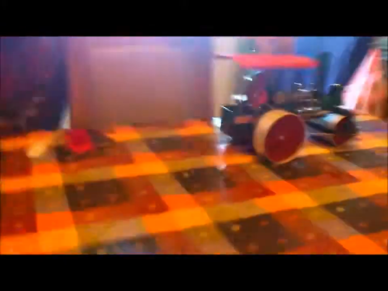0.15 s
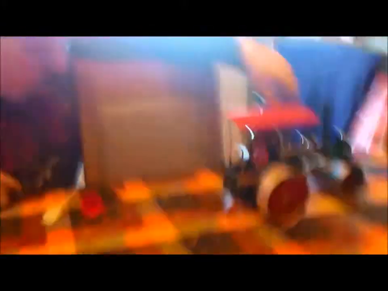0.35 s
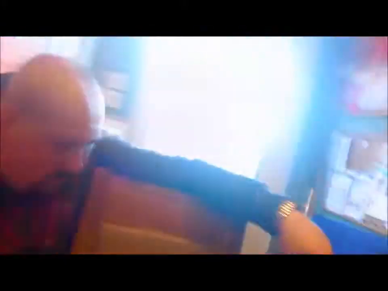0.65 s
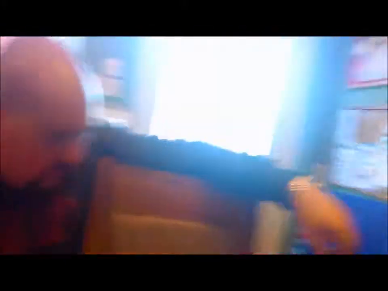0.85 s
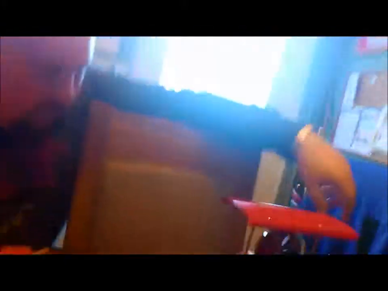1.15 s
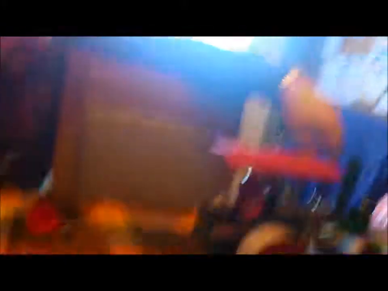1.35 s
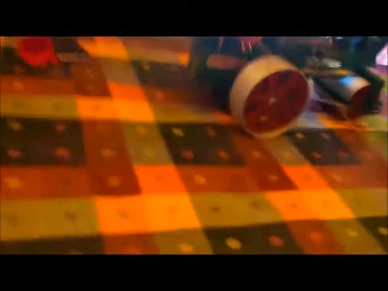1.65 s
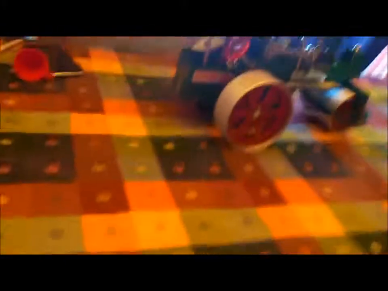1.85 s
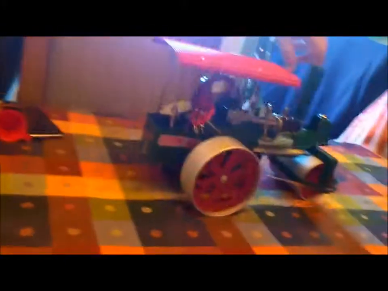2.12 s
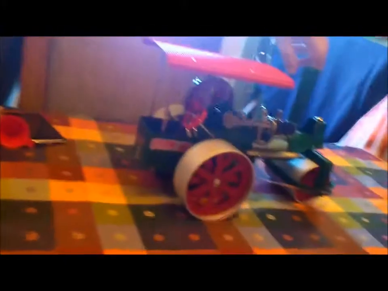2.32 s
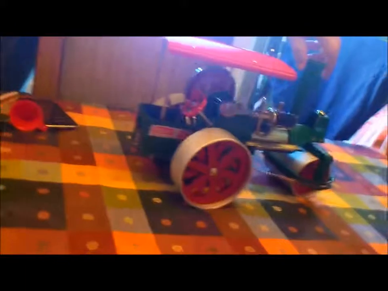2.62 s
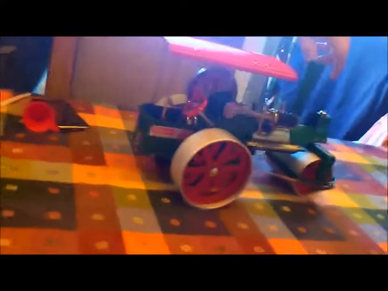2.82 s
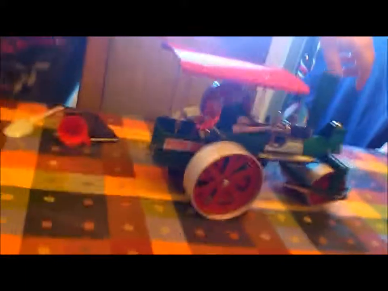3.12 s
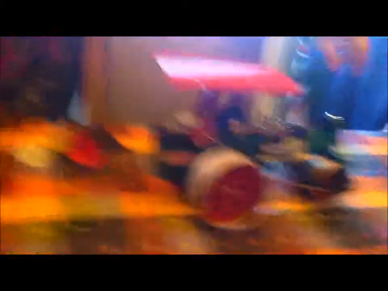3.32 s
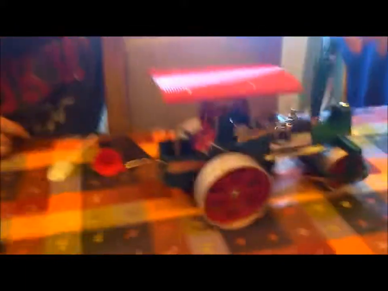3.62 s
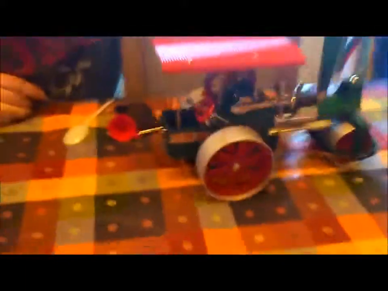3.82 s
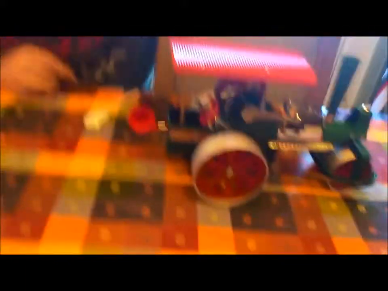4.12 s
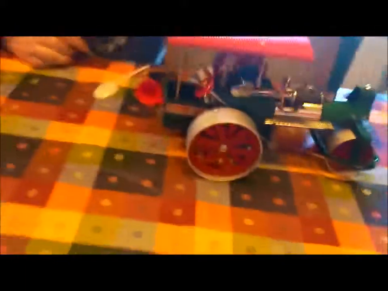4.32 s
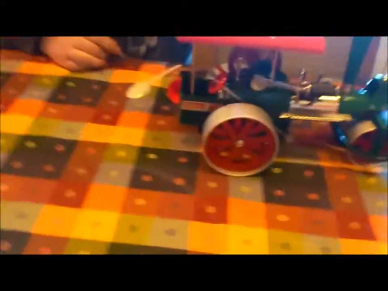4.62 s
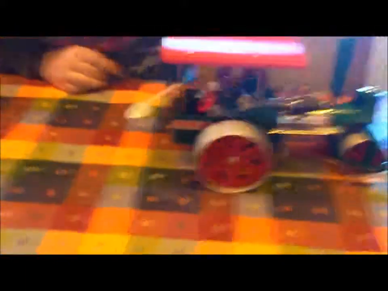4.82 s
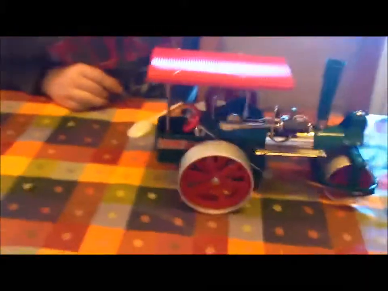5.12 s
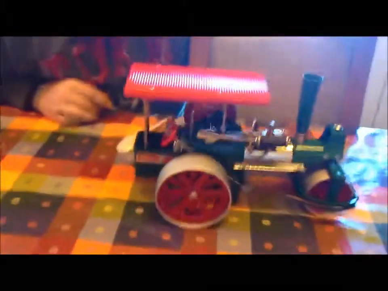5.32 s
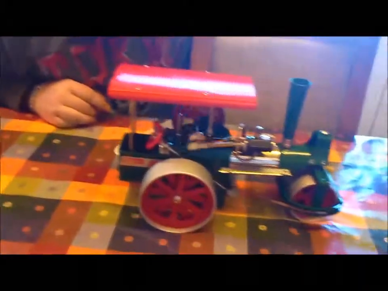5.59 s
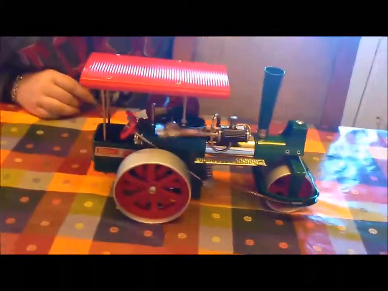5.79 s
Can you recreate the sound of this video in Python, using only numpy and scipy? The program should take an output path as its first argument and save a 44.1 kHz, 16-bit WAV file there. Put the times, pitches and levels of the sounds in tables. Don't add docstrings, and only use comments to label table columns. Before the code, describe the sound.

Continuous fast mechanical chatter from a model steam roller indoors. It starts slower and lighter, speeds up until about three seconds, then idles steadily. Sharp steel ticks, short hollow clacks and seeping steam ride on the rattle, while occasional low thumps ring the table top. Faint room rumble and camera-handling jolts lie underneath; the close stereo image sways as the camera moves.

```python
import sys
import numpy as np
from scipy import signal
from scipy.fft import rfft, irfft, next_fast_len
from scipy.io import wavfile
from scipy.ndimage import uniform_filter1d

SR = 44100
rng = np.random.default_rng(int(sys.argv[2]) if len(sys.argv) > 2 else 0)


def volts_from_db(level):
    exponent = np.asarray(level, float) / 20
    return 10 ** exponent


def transcribe(u):
    v = np.clip(np.atleast_2d(u).T, -1, 1)
    q = np.round(v * 32767).astype(np.int16)
    wavfile.write(sys.argv[1], SR, q)


N = 262395
SIZE = next_fast_len(N + SR)
HZ = np.fft.rfftfreq(SIZE, 1 / SR)

# pitch_hz, left_right_db
TILT = [(60, -0.5), (120, 7), (240, -7), (480, 0), (950, -1.5), (1890, -3), (3770, -1), (7520, 10),
        (15000, -1)]
# time_s, left_right_db
SWAY = [(0.0, 3.0), (0.25, 7.5), (0.56, 2.0), (2.87, 7.0), (3.33, 4.0), (3.66, 7.5), (4.16, 3.0),
        (4.26, 7.5), (4.84, 1.5), (5.09, 5.0), (5.55, 2.5), (5.95, 7.5)]
SPLITS_HZ = 1800, 2300, 3700, 7300


def engine():
    load_db = loads()
    sway_s, sway_db = np.transpose(SWAY)
    rattle = gears()
    response = metal() * volts_from_db(np.outer([.5, -.5], read(TILT, HZ)))
    over = [1] + [1 / (1 + (hz / (HZ + 1)) ** 24) for hz in SPLITS_HZ] + [0]
    out = knocks(response * near_pins(-15))
    for k, db in enumerate(load_db):
        band = irfft(rattle * response * (over[k] - over[k + 1]), SIZE)[:, :N]
        flutter_db = 1.2 * slow(size=1200)
        out += volts_from_db(db + flutter_db) * steadied(band, size=1800)
    pan_db = np.interp(np.arange(N) / SR, sway_s, sway_db - sway_db.mean())
    return out * volts_from_db(np.outer([.4, -.4], pan_db))


# time_s, teeth_per_s
TEETH = [
    (0, 79.5),
    (.5, 87),
    (1, 89),
    (1.5, 91),
    (2.2, 97.9),
    (3, 104.5),
    (4, 101),
    (5, 103.2),
    (5.95, 102),
]


def gears(count=6, spread_db=1.6, jitter=.1, bounce_s=0.002, rise_s=0.0013, bounces_per_s=8000,
          steam_db=-5.5, lumps_db=3.5, drift_db=5):
    speed = np.interp(np.arange(N) / SR, *np.transpose(TEETH)) * (1 + jitter * slow(size=200))
    tooth = np.diff(np.floor(np.cumsum(speed) / SR), prepend=0) > 0
    force = tooth * volts_from_db(spread_db * np.clip(rng.standard_normal(N), -2, 2))
    point = rng.integers(0, count, N)
    near = near_pins(-3)
    out = 0
    for k in range(count):
        loose = signal.lfilter([1], [1, -np.exp(-1 / (bounce_s * SR))], force * (point == k))
        loose = signal.lfilter([1], [1, -np.exp(-1 / (rise_s * SR))], loose)
        grit = np.clip(rng.standard_normal(N), -2, 2)
        bounces = loose * grit * (rng.random(N) < bounces_per_s / SR)
        lumps = rng.standard_normal(size=60)
        seep = volts_from_db(steam_db) * rng.standard_normal(N) * np.std(bounces)
        turn_db = drift_db * np.clip(slow(size=2500), -2, 1)
        pressed = rfft(bounces * volts_from_db(.28 * turn_db), SIZE) * near + rfft(seep * volts_from_db(turn_db), SIZE)
        lump = np.interp(HZ, np.linspace(0, SR / 2, len(lumps)), lumps)
        own = volts_from_db(lumps_db * lump * (HZ < SPLITS_HZ[-1]))
        out = out + pressed * own * path(-.4, 1.2 + 7 * k / (count - 1))
    return out


# start_s, peak_db
KNOCKS = [(0.0174, -30), (0.0553, -27), (0.0912, -30), (0.1535, -23), (0.2024, -22), (0.2389, -24),
          (0.2648, -22), (0.3012, -29), (0.3202, -26), (0.3556, -27), (0.3686, -23), (0.402, -24),
          (0.4549, -19), (0.5057, -19), (0.61, -18), (0.6644, -18), (0.7053, -20), (0.7327, -17),
          (0.7871, -23), (0.8006, -23), (0.856, -21), (0.8774, -18), (0.9388, -21), (0.9916, -23),
          (1.0705, -26), (1.1243, -25), (1.1672, -23), (1.2221, -21), (1.2635, -25), (1.3069, -20),
          (1.3379, -21), (1.4112, -22), (1.4441, -19), (1.4691, -19), (1.5628, -20), (1.6272, -21),
          (1.695, -22), (1.7449, -23), (1.7779, -22), (1.8083, -21), (1.924, -23), (1.944, -22),
          (1.9659, -21), (1.9939, -20),
          (2.0178, -20), (2.0692, -22), (2.0996, -21), (2.2323, -21), (2.2792, -18), (2.3286, -24),
              (2.3705, -25), (2.3945, -23), (2.4059, -21), (2.4538, -19), (2.5391, -20), (2.5581, -22),
              (2.5875, -23), (2.6055, -22), (2.6609, -24), (2.6758, -22), (2.7132, -24), (2.7716, -24),
              (2.7836, -21), (2.822, -18), (2.8849, -21), (2.9093, -20), (2.9392, -18), (2.9692, -19),
              (2.9986, -18), (3.0485, -20), (3.0869, -20), (3.1223, -20), (3.1917, -22), (3.244, -25),
              (3.2655, -22), (3.3154, -23), (3.3513, -25), (3.3877, -21), (3.4156, -19), (3.4695, -22),
              (3.5374, -27), (3.5748, -26), (3.5937, -24), (3.6132, -21), (3.6436, -20), (3.701, -21),
              (3.7274, -18), (3.7594, -18), (3.7963, -17), (3.8891, -18), (3.9734, -16),
          (4.0128, -20), (4.0248, -19), (4.0926, -21), (4.133, -22), (4.1829, -20), (4.2393, -19),
               (4.2767, -22), (4.3061, -20), (4.3595, -25), (4.4154, -22), (4.4523, -20), (4.4777, -18),
               (4.5581, -17), (4.6948, -19), (4.7377, -18), (4.793, -20), (4.8394, -24), (4.8579, -21),
               (4.8878, -24), (4.9252, -20), (4.9582, -24), (5.0001, -22), (5.0195, -23), (5.0579, -19),
               (5.0933, -23), (5.1153, -23), (5.1637, -20), (5.1816, -18), (5.2131, -19), (5.3114, -18),
               (5.3308, -18), (5.3687, -19), (5.3947, -17), (5.4306, -20), (5.5024, -22), (5.5797, -23),
               (5.6017, -20), (5.6206, -21), (5.7129, -27), (5.7349, -26), (5.7479, -26), (5.7992, -24),
               (5.8187, -23), (5.8576, -22), (5.893, -24), (5.9314, -23)]


def knocks(response, gain_db=1.5, rise_s=.0008, fall_s=.004):
    out = np.zeros(N)
    t = np.arange(SR // 50) / SR
    rows = KNOCKS
    envelope = np.exp(-t / fall_s) * (1 - np.exp(-t / rise_s))
    burst = rng.standard_normal((len(rows), len(t))) * envelope
    rung = signal.fftconvolve(burst, irfft(response.mean(0), SIZE)[None, :len(t)], axes=1)
    for (s, db), sound, top in zip(rows, burst, abs(rung).max(1)):
        add(out, s, volts_from_db(db + gain_db) * sound / top)
    return irfft(rfft(out, SIZE) * response * path(-6, 4), SIZE)[:, :N]


# pitch_hz, density_db_per_hz
COLOUR = [(250, -39), (450, -21.5), (1000, -10), (1600, -9), (2250, -11), (2600, -5.5), (4500, -3.5),
          (6000, -9), (8000, -5.5), (9200, 0), (10200, -6), (11400, -5.5), (12250, -10.5), (13500, -12),
          (14200, -25), (16000, -24)]
# pitch_hz, width_hz, level_db (over the colour scale)
PARTS = [(545, 55, -8.5), (802, 27, -8), (869, 29, -11), (1010, 30, -19), (1200, 40, -6), (1370, 55, -9.5),
         (1933, 46, -4.5), (2040, 130, -3.5), (2091, 38, -1), (3183, 16, 0), (3970, 200, -11),
         (4750, 270, -8), (2850, 140, -5), (3166, 90, -3), (8560, 86, 5), (8590, 110, 8.5), (8750, 120, 5),
         (8900, 200, -6), (12690, 80, 5.5), (14700, 340, -10)]


def metal():
    peaks = sum(volts_from_db(2 * db) / (1 + (2 * (HZ - hz) / width) ** 2) ** 1.29 for hz, width, db in PARTS)
    log_gain = .5 * np.log(volts_from_db(2 * read(COLOUR, HZ)) + peaks)
    mirrored = np.r_[log_gain, log_gain[1:SIZE - len(HZ) + 1][::-1]]
    return np.exp(np.conj(signal.hilbert(mirrored)))[:len(HZ)]


def near_pins(away_db, pins_hz=8700, width_hz=1800):
    return volts_from_db(away_db) + (1 - volts_from_db(away_db)) / (1 + (2 * (HZ - pins_hz) / width_hz) ** 2)


# start_s, effort_db (at mid-turn)
TURNS = [
    (-0.178, -6.7),
    (0.123, -1.5),
    (1.091, 0.9),
    (1.913, 0.1),
    (2.717, 0.8),
    (3.508, 1.5),
    (4.294, 2.2),
    (5.026, 1.4),
    (5.802, 1.4),
    (6.64, 1.4),
]
# mean_db, once_per_turn_db, once_peak_turns, twice_per_turn_db, twice_peak_turns
SWING = [(-44.26, 2.36, 0.66, 0.84, 0.27), (-44.6, 1.98, 0.6, 1.24, 0.33), (-37.99, 2.69, 0.59, 1.63, 0.32),
         (-35.2, 2.72, 0.43, 0.98, 0.36)]
# peak_s, length_s, body_db, pins_db
BINDS = [(0.068, 0.121, 4.5, -1.5), (0.197, 0.086, 1.0, 5.0), (0.322, 0.049, -2.0, -3.0),
         (0.67, 0.141, 1.5, 5.0), (0.899, 0.056, 0.0, 6.5), (1.022, 0.062, -1.0, -2.5),
         (1.28, 0.048, -2.0, -3.0), (1.443, 0.197, 1.5, -0.5), (1.887, 0.041, -0.5, -10.0),
         (1.971, 0.122, -0.5, 2.5), (2.215, 0.036, -0.5, -5.0), (2.276, 0.024, 1.5, 2.5),
         (2.36, 0.053, -1.0, -5.5), (2.745, 0.042, -5.0, -2.0), (2.746, 0.022, 2.0, -7.5),
         (2.827, 0.183, 1.0, 2.5), (3.238, 0.041, -2.5, -4.5), (3.357, 0.057, -2.0, -3.5),
         (3.423, 0.049, 0.0, 4.0), (3.556, 0.038, -3.0, -4.0), (3.649, 0.037, -0.5, 3.0),
         (4.017, 0.06, -0.5, 3.0), (4.279, 0.06, -2.0, 2.0), (4.717, 0.04, -3.5, 0.0),
         (4.933, 0.026, 1.0, 4.5), (5.554, 0.036, -2.0, -5.5), (5.684, 0.033, -1.0, -4.5),
         (5.725, 0.032, 3.5, -2.5), (5.782, 0.03, -1.5, -8.5), (5.843, 0.055, 0.5, 2.5)]
# peak_s, length_s, body_db, shell_db
STRAINS = [(-0.006, 0.239, -0.5, -5.0), (0.67, 0.044, -2.0, 2.0), (0.749, 0.046, 2.5, -0.5),
           (0.789, 0.025, -1.0, -2.5), (0.892, 0.231, 1.5, -2.5), (1.16, 0.033, 3.0, -2.0),
           (1.209, 0.024, -1.5, -0.5), (1.326, 0.033, 2.5, 6.0), (1.4, 0.023, -1.0, -0.5),
           (1.459, 0.042, 1.0, 4.5), (1.607, 0.079, -1.5, -0.5), (1.682, 0.041, 1.5, 1.5),
           (1.775, 0.033, -2.0, -2.5), (1.834, 0.024, 2.0, 2.5), (2.255, 0.099, 1.5, -1.5),
           (2.46, 0.035, -0.5, -2.5), (2.92, 0.046, 0.0, -4.0), (3.105, 0.07, 2.5, -1.5),
           (3.372, 0.062, 1.5, -2.0), (3.457, 0.041, -1.5, 4.0), (3.493, 0.034, -1.5, -3.5),
           (4.087, 0.125, -0.5, 2.5), (4.374, 0.242, -1.0, 2.0), (4.572, 0.034, -2.0, -1.0),
           (4.801, 0.107, -1.5, 2.5), (4.953, 0.071, 0.0, 2.5), (5.255, 0.047, 2.5, -1.0),
           (5.349, 0.065, -1.5, -1.0), (5.451, 0.059, 0.0, 2.0), (5.612, 0.071, -0.5, 2.5)]
BIND_SHARES = [(1, 0), (1.1, -.16), (.59, .34), (0, 1)]
STRAIN_SHARES = [(1, 0), (0, 1), (.81, .6), (0, 0)]
# time_s, upper_over_lower_db
LEAN = [(0.0, -1.3), (0.23, 3.2), (0.53, -1.4), (0.82, -2.3), (1.36, 0.4), (1.83, -1.9), (2.28, 1.6),
        (2.63, -1.3), (3.19, -0.4), (3.47, -3.5), (3.66, 0.3), (4.01, 1.4), (4.26, -0.5), (4.9, 2.7),
        (5.02, -0.1), (5.37, 2.2), (5.74, -0.3), (5.94, 3.1)]


def loads():
    binds, strains = np.array(BINDS), np.array(STRAINS)
    start_s, effort_db = np.transpose(TURNS)
    t, bind = bumps(binds[:, :2])
    _, strain = bumps(strains[:, :2])
    count = np.arange(len(start_s))
    turn = np.interp(t, start_s, count)
    mean_db, once_db, once_at, twice_db, twice_at = np.transpose(SWING)[:, :, None]
    db = mean_db + np.interp(turn, count + .5, effort_db)
    db = db + once_db * np.cos(2 * np.pi * (turn - once_at))
    db = db + twice_db * np.cos(2 * np.pi * 2 * (turn - twice_at))
    db = db + BIND_SHARES @ binds[:, 2:].T @ bind
    db = db + STRAIN_SHARES @ strains[:, 2:].T @ strain
    lean_db = np.interp(t, *np.transpose(LEAN)) / 2
    body, shell, frame, pins = db
    parts = body, shell, frame - 4.7 - lean_db, frame - 2.9 + lean_db, pins
    return [np.interp(np.arange(N) / SR, t, part) for part in parts]


# start_s, peak_db, pitch_hz
CLACKS = [(0.0303, -30, 2980), (0.0568, -24, 1910), (0.1461, -34, 2190), (0.3636, -28, 1910),
          (0.5117, -24, 2010), (0.6045, -25, 2090), (0.6858, -23, 3130), (0.8131, -21, 3130),
          (0.8694, -23, 2470), (0.8929, -21, 3180), (0.9822, -25, 2070), (1.052, -24, 3070),
          (1.278, -28, 2040), (1.3219, -15, 2030), (1.4257, -19, 2060), (1.4561, -16, 2060),
          (1.5554, -22, 2040), (1.6511, -22, 2070), (1.7888, -27, 2020), (1.8317, -22, 3010),
          (1.8961, -30, 2090), (2.362, -24, 2040), (2.3835, -27, 2000), (2.4134, -26, 2010),
          (2.4877, -22, 2050), (2.5391, -24, 4120), (2.6828, -26, 2100), (2.7856, -29, 1920),
          (2.8439, -24, 1910), (2.9517, -26, 2440), (2.9816, -22, 3170), (3.1847, -24, 2040),
          (3.2645, -24, 2080), (3.3857, -25, 2720), (3.4466, -20, 2100), (3.5758, -29, 2720),
          (3.9958, -21, 2090), (4.1435, -18, 3890), (4.2238, -25, 2090), (4.3116, -26, 2090),
          (4.4303, -24, 2090), (4.8409, -20, 2100), (4.9462, -20, 2060), (4.9831, -22, 2860),
          (5.2041, -26, 2090), (5.4864, -21, 3990), (5.5997, -19, 2090), (5.7139, -21, 2060),
          (5.7902, -28, 1970)]


def clacks(gain_db=-2.5, fall_s=0.005, below=.75, above=1.7):
    out = np.zeros(N)
    t = np.arange(SR // 30) / SR
    for (s, db, hz), grit in zip(CLACKS, rng.standard_normal((len(CLACKS), len(t)))):
        band = signal.butter(2, [below * hz, above * hz], "band", fs=SR)
        sound = signal.lfilter(*band, grit) * np.exp(-t / fall_s)
        add(out, s, volts_from_db(db + gain_db) * sound / abs(sound).max())
    return irfft(rfft(out, SIZE) * path(-4, 4.5), SIZE)[:, :N]


# start_s, peak_db, pitch_hz, t60_s, ring_db (table over blow)
THUMPS = [(0.054, -28, 283, 0.093, -11), (0.084, -32, 400, 0.055, -16), (0.215, -35.5, 380, 0.045, -13),
          (.657, -46, 153, .07, -4), (.927, -46, 159, .07, -4), (1.034, -39, 160, 0.085, -3),
          (1.3, -45, 155, .07, -4), (1.362, -46, 159, .07, -4), (1.445, -47, 164, .07, -4),
          (1.141, -45, 149, 0.07, -3), (1.5925, -23.5, 143, 0.14, -8), (1.665, -28, 146, 0.15, -7),
          (2.08, -39, 277, 0.078, -5.5), (2.249, -37.5, 122.7, 0.054, -5), (2.399, -25, 235, 0.08, -9),
          (3.0925, -25.5, 139, 0.16, -9), (3.163, -31, 151, 0.12, -7), (2.577, -47, 161, .07, -4),
          (2.813, -43, 137, .07, -4), (2.961, -45, 210, .07, -5), (4.0, -46, 180, .07, -5),
          (4.133, -43, 167, .07, -4), (4.199, -42, 110.1, 0.07, -6), (4.536, -41.5, 159, 0.097, -5),
          (4.603, -40.5, 158, 0.077, -4.5), (4.693, -41, 156, 0.06, -3), (4.789, -44, 151, .07, -4),
          (4.9, -43, 150, .07, -4), (5.689, -47, 159, .07, -4)]
# pitch_hz, level_db, t60_s
TABLE_MODES = [(141.6, -2.5, 0.46), (157, -5.5, 0.31), (241, -2.5, .11), (291.4, -2, 0.1), (480, -6, 0.05)]


def table(push_db=3, push_s=.0005, tick_db=-5, tick_s=0.004, ring_rise_s=.003, rise_s=0.00052):
    out = np.zeros(N)
    t = np.arange(SR // 2) / SR
    modes = sum(volts_from_db(d - 60 * t / decay) * np.sin(2 * np.pi * f * t) for f, d, decay in TABLE_MODES)
    modes = modes * (1 - np.exp(-t / ring_rise_s))
    push = volts_from_db(push_db) * t / push_s * np.exp(1 - t / push_s)
    for (s, db, hz, t60, ring_db), grit in zip(THUMPS, rng.standard_normal((len(THUMPS), SR // 2))):
        band = signal.butter(2, [0.32 * hz, 1.88 * hz], "band", fs=SR)
        rough = evened(signal.lfilter(*band, grit))
        tone = volts_from_db(-60 * t / t60) * (np.sin(2 * np.pi * hz * t) + 0.35 * rough)
        tick = volts_from_db(tick_db) * grit * np.exp(-t / tick_s)
        thump = tone + push + tick + volts_from_db(ring_db) * modes
        add(out, s, -volts_from_db(db - 3) * thump * (1 - np.exp(-t / rise_s)))
    out = signal.lfilter(*signal.butter(2, 95, "high", fs=SR), out)
    return irfft(rfft(out, SIZE) * path(-12, .3), SIZE)[:, :N]


# pitch_hz, density_db_per_hz
FLOOR = [(12, -35), (20, 3), (65, -7.5), (173, 4), (358, -6), (483, -3.5), (544, -12), (621, -10.5),
         (700, -12), (910, -18), (1540, -120)]
# peak_s, over_grip_db, length_s
JOLTS = [(.08, 3, .06), (.21, 2.5, .06), (1.0, 7, .08), (1.61, 15, .12), (2.09, 9, .07), (2.25, 14, .08),
         (2.6, 10, .08), (3.1, 15, .09), (3.38, 5, .05), (3.76, 4, .08), (4.16, 8, .14), (4.44, 4, .1),
         (4.6, -6, .12), (4.9, 6, .1), (5.35, 5, .15), (5.58, 5, .06)]


def rumble(floor_db=-59, grip_db=-68.5, tremor_db=2):
    noise = rfft(rng.standard_normal((3, N)), SIZE)
    both = (noise[0] + noise[1:] * (0.14 + 28 / (HZ + 15))) * volts_from_db(read(FLOOR, HZ))
    deep = 1 / (1 + (HZ / 95) ** 8)
    shake = steadied(irfft(both * deep, SIZE)[:, :N], size=6000)
    room = evened(irfft(both * (1 - deep), SIZE)[:, :N])
    jolts = np.array(JOLTS)
    t, jolt = bumps(jolts[:, ::2])
    shake_db = grip_db + np.interp(np.arange(N) / SR, t, jolts[:, 1] @ jolt) + tremor_db * slow(size=2000)
    room_db = floor_db + 1.5 + 2.45 * slow(size=2500)
    return volts_from_db(shake_db) * shake + volts_from_db(room_db) * room


# pitch_hz, likeness [0-1]
SAME = [(60, 0.55), (130, 0.99), (290, 0.81), (640, 1), (1410, 0.7), (3100, 0.04), (6820, 0.1),
        (15000, 0.3)]
# pitch_hz, t60_s
ROOM = [(200, 0.39), (1000, 0.19), (4000, 0.16), (12000, 0.06)]


def path(wet_db, lag):
    taps = rng.choice([-1., 1.], (2, SR // 2)) * (rng.random((2, SR // 2)) < .06)
    taps[:, :40] = 0
    hz, t, z = signal.stft(taps, SR, nperseg=128)
    tail = signal.istft(z * volts_from_db(-60 * t / read(ROOM, hz)[:, None]), SR, nperseg=128)[1]
    left, other = rfft(tail / np.linalg.norm(tail[0]), SIZE) * volts_from_db(wet_db)
    same = np.clip(read(SAME, HZ), 0, 1)
    right = same * left + np.sqrt(1 - same ** 2) * other
    delay = np.exp(-2j * np.pi * HZ * lag / SR / np.sqrt(1 + (HZ / 2300) ** 2))
    return np.array([1 + left, (1 + right) * delay])


def evened(x):
    return x / np.sqrt(np.mean(x ** 2) + 1e-20)


def slow(size):
    return evened(uniform_filter1d(uniform_filter1d(rng.standard_normal(N), size), size))


def steadied(x, size):
    return x / np.sqrt(uniform_filter1d(uniform_filter1d(x.mean(0) ** 2, size), size) + 1e-20)


def bumps(rows, sudden=.25):
    s, length = np.transpose(rows)[:, :, None]
    t = np.arange(0, N + 64, 64) / SR
    side = np.where(t < s, 1 - sudden, 1 + sudden)
    return t, np.exp(-2 * ((t - s) / (length * side)) ** 2)


def read(points, hz):
    f, value = np.transpose(points)
    return np.interp(np.log(hz + 1), np.log(f + 1), value)


def add(mix, s, sound):
    part = mix[round(s * SR):][:len(sound)]
    part += sound[:len(part)]


def scene():
    return engine() + clacks() + table() + rumble()


# pitch_hz, threshold_db
MUTE_BELOW = [(9500, -101), (10500, -75), (12000, -77), (13200, -75), (14200, -73), (14700, -76),
              (15300, -75)]


def muted(x, size=2048, count=64):
    hz, _, z = signal.stft(x, SR, nperseg=size)
    bins = size // 2 // count
    power = (abs(z[:, 1:]) ** 2).mean(0).reshape(count, bins, -1).mean(1)
    over_db = 10 * np.log10(power.repeat(bins, axis=0) + 1e-20) - read(MUTE_BELOW, hz[1:])[:, None]
    z[:, 1:] *= 1 / (1 + np.exp(-np.clip(3 * over_db, -9, 9)))
    return signal.istft(z, SR, nperseg=size)[1][:, :N]


def low_pass(x):
    return signal.sosfilt(signal.butter(12, 15740, fs=SR, output="sos"), x)


def record(dry):
    mix = muted(dry)
    return low_pass(mix)


dry = scene()
out = record(dry)
transcribe(out)
```